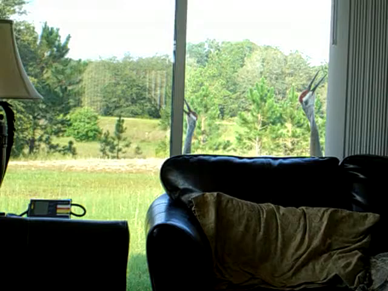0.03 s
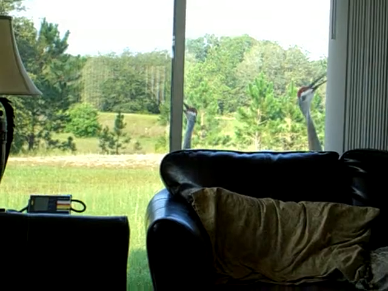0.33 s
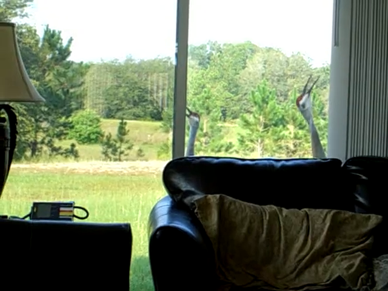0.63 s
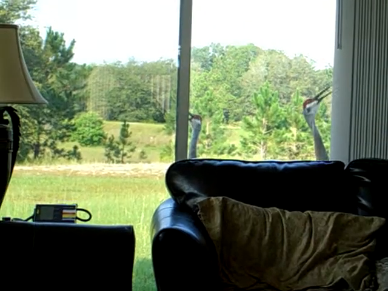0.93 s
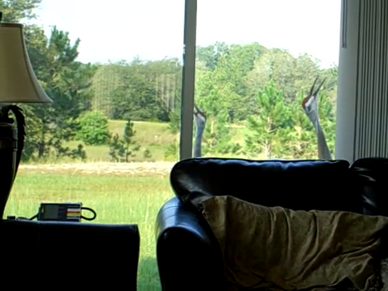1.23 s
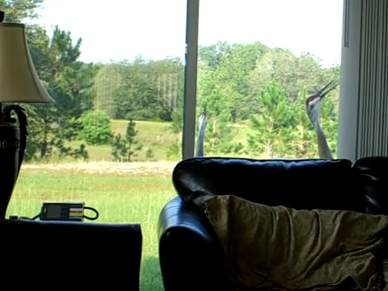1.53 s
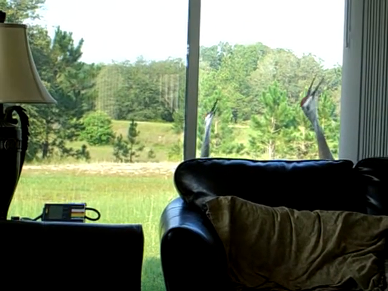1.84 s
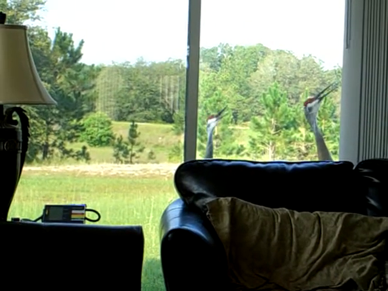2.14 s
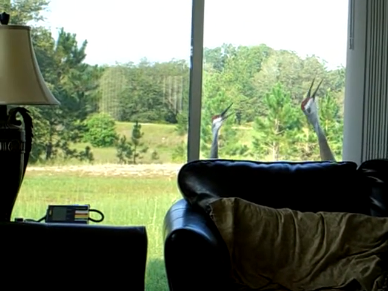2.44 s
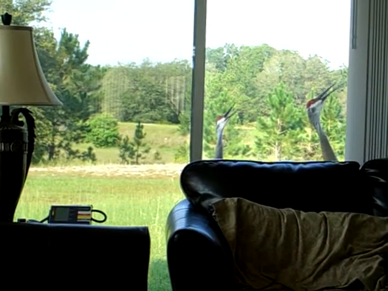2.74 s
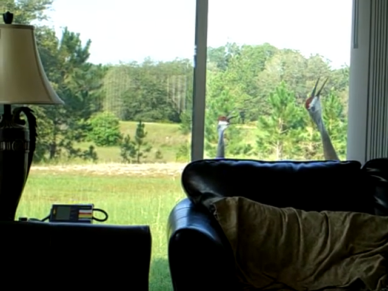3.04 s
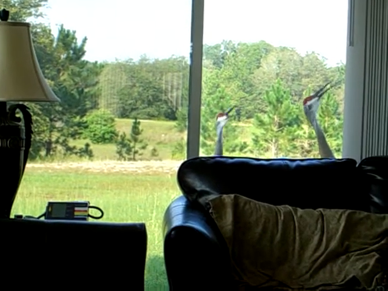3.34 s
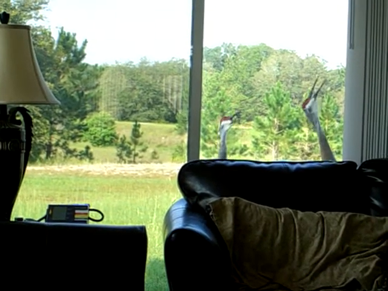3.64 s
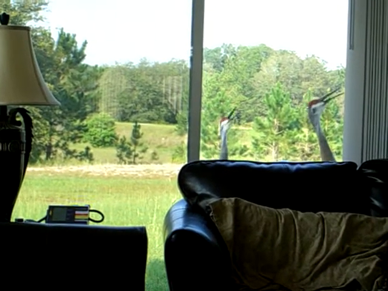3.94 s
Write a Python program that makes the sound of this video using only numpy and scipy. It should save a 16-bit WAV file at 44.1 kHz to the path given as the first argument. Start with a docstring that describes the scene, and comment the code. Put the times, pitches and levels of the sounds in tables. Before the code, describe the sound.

A pair of cranes keeps up a steady, harsh duet: a rattling bugle from one, then one or two higher squawks from the other. The calls come through a window and ring briefly in a living room over faint hiss.

```python
"""Two sandhill cranes call in unison outside a window, with the microphone indoors in a living room.
The male starts each call on a low note, steps up to a clear bugle and breaks into a falling rattle;
the female answers with one or two short, higher, harsh notes. Each voice is a buzzing membrane coloured
by windpipe and bill. The room rings on around the microphone; faint hoots, hum and whine lie below."""
import sys
import numpy as np
from scipy import signal
from scipy.fft import rfft, irfft, next_fast_len
from scipy.io import wavfile
from scipy.ndimage import uniform_filter1d

SR = 44100
rng = np.random.default_rng(int(sys.argv[2]) if len(sys.argv) > 2 else 0)


def wav_out(sig):
    """Save sig, one row per channel (or a flat mono array), as 16-bit PCM at SR to the path in sys.argv[1]."""
    wavfile.write(sys.argv[1], SR, np.round(np.clip(np.atleast_2d(sig).T, -1, 1) * 32767).astype(np.int16))


N = 176400

# The male's calls. Each row: start, step up, break into rattle and end in seconds, bugle pitch in Hz,
# fundamental and overtone trims in dB.
MALE_BUGLES = [(-.04, 0.018, .1, 0.25, 826.8, -3.5, -0.5), (0.617, .672, 0.75, 0.9, 834.5, -2.5, 0),
               (1.195, 1.269, 1.346, 1.5, 832, -3.5, -0.5), (1.795, 1.86, 1.966, 2.088, 831.8, -3, 0.5),
               (2.422, 2.488, 2.585, 2.745, 826, -4, 1), (3.044, 3.104, 3.215, 3.284, 822.6, -2.5, 0),
               (3.608, 3.671, 3.72, 3.885, 820.3, -4, -0.5)]
# Points along his call: 0 is the start, 1 the step, 2 the break, 3 the end.
MALE_POINTS = [0, .2, .8, 1, 1.15, 1.8, 2.15, 2.7, 3]
# One row a point: ratio to the bugle pitch, fundamental and overtones in dB, roughness from 0 to 1.
MALE_CONTOUR = [(.865, -22.5, -24, .35), (.878, -23.5, -30.5, .2), (.895, -23.5, -27.5, 0.21),
                (.975, -29.5, -31, 0.19), (.997, -21.5, -25.5, .05), (.997, -18.5, -27.5, 0.03),
                (1.07, -30, -36, 0.83), (1.02, -24, -33.5, 0.86), (.95, -24.5, -35.5, 0.61)]
# The female's notes. Each row: start and length in seconds, pitch in Hz, fundamental and overtone
# trims in dB.
FEMALE_ANSWERS = [(0.129, 0.067, 980, 2.5, -1), (.245, 0.078, 990, -4.5, -4.5),
                  (0.495, 0.028, 929, -6.5, -14), (0.519, 0.076, 1002, -1.5, -0.5),
                  (0.744, 0.097, 996, -0.5, -4.5), (0.907, 0.071, 1019, 0.5, -0.5),
                  (1.307, 0.16, 1123, -1, -0.5), (1.519, .11, 1136, -1.5, 1), (1.867, 0.082, 1125, 0, -0.5),
                  (2.131, 0.098, 1122, -1, .5), (2.473, .135, 1122, -1, -1), (2.751, .1, 1100, -1.5, -1),
                  (3.166, 0.11, 1091, -1, -2.5), (3.417, 0.11, 1110, -.5, 0), (3.742, 0.093, 1102, 1, -1),
                  (3.963, 0.07, 978, -2.5, -5.5)]
# Points along her note, as shares of its length.
FEMALE_POINTS = [0, .2, .45, .7, 1]
# One row a point: ratio to the note's pitch, fundamental and overtones in dB, roughness from 0 to 1.
FEMALE_CONTOUR = [(.97, -32.5, -28, .2), (1.01, -30.5, -26.5, 0.21), (1.12, -30.5, -28.5, .85),
                  (1.02, -26.5, -27.5, .55), (.98, -27.5, -38, 0.28)]
# Each bird's syrinx: rattle rate in Hz and depth from 0 to 1; rattle pull, rough jitter and clear waver
# as shares of the pitch; overtone swell in seconds; rasp in dB.
MALE_SYRINX = dict(rattle_hz=79.88, depth=.85, pull=0.0933, jitter=.085, waver=0.0073, swell_s=0.015, rasp_db=0)
FEMALE_SYRINX = dict(rattle_hz=110.12, depth=0.64, pull=0.086, jitter=0.0704, waver=0.0089, swell_s=0.0048, rasp_db=-4)
# Colour of windpipe and bill on the overtones. Each row: frequency in Hz, gain in dB.
MALE_WINDPIPE = [(500, -10.5), (1000, 14.5), (1430, 1.5), (1660, 1.5), (1900, 8), (2150, 9.5), (2500, -3.5),
                 (2750, -4), (3300, 3.5), (3700, 2), (4200, 2.5), (5800, 1), (7500, -2.5), (10000, -9),
                 (13000, -19), (15500, -24)]
FEMALE_WINDPIPE = [(500, -7), (1000, 17.5), (1550, 0.5), (2250, 3.5), (2750, -5), (3400, 2), (4500, 1.5),
                   (5800, 1), (7500, -3.5), (10000, -11), (13000, -21), (15500, -23)]
# Faint hoots between the calls. Each row: start in seconds, pitch in Hz, peak in dB ahead of the room.
LOW_HOOTS = [(2.27, 271, -52), (2.89, 279, -48), (3.552, 287, -45.5), (3.869, 293, -48.5)]
# The living room's tail. Each row: frequency in Hz, reverberation time in seconds.
ROOM_DECAY = [(300, 0.87), (1000, 0.53), (3000, .62), (7000, 0.61), (15000, 0.14)]
# Narrow peaks where the sound rings on. Each row: frequency in Hz, width in Hz, gain added at the peak.
RINGING_PEAKS = [(765, 19, 0.53), (1073, 11.5, 0.73), (1120, 4.7, 0.133), (1370, 8.3, 0.37), (1626, 33, 0.66),
                 (2230, 19, 0.55), (4170, 38, 0.32), (4460, 70, 0.67)]
# Room tone at the microphone. Each row: frequency in Hz, relative noise density in dB.
ROOM_TONE = [(25, -5), (70, -5), (130, -2), (270, 2.5), (450, 1), (1000, 7.5), (3000, -7), (8000, -14),
             (15500, -16)]
# Hum and electrical whine. Each row: frequency in Hz, level in dB.
HUM_TONES = [(61, -69), (186, -57.5), (7522, -52.5), (15040, -62)]
# The recorder's level coming up. Each row: time in seconds, gain in dB.
GAIN_RISE = [(.07, -14.5), (.25, -3), (.5, 0.5), (.68, 3)]

ATTACK_S, RELEASE_S = 0.0056, 0.036
JITTER_HZ, RATTLE_SPREAD = 149.8, .3  # speed of the pitch jitter; share by which the rattle rate wanders
SHIMMER_DB, SHIMMER_HZ = 1.2, 51.6  # unsteady loudness of the voice
CHOP_POWER = 1.08  # the rattle chops the overtones harder than the fundamental
BILL_CUT_HZ = 560  # the bill radiates little below this
HOOT_S, HOOT_RISE, HOOT_JITTER = 0.065, 0.22, 0.015  # rise and jitter as shares of the pitch
EARLY_T60_S, EARLY_DB, TAIL_DB, ROOM_EVEN_HZ = .11, 1.5, 0.5, 45
ROOM_TONE_DB, HUM_WAVER_DB, HUM_WANDER_HZ = -47.5, .7, 1.2
SWITCH_ON_S, CUTOFF_HZ = 0.071, 15750


def male_crane():
    """The male, outside the window: low note, clear bugle, falling rattle."""
    calls = [(np.interp(MALE_POINTS, np.arange(len(marks)), marks), hz, db, overtone_db)
             for *marks, hz, db, overtone_db in MALE_BUGLES]
    return crane(calls, MALE_CONTOUR, MALE_SYRINX, MALE_WINDPIPE)


def female_crane():
    """The female, also outside: short arched notes, harshest in the middle."""
    calls = [(start + length * np.array(FEMALE_POINTS), hz, db, overtone_db)
             for start, length, hz, db, overtone_db in FEMALE_ANSWERS]
    return crane(calls, FEMALE_CONTOUR, FEMALE_SYRINX, FEMALE_WINDPIPE)


def crane(calls, contour, voice, windpipe):
    """One bird: every call follows its contour; the windpipe colours the overtones, the bill cuts bass."""
    fundamental, overtones = np.zeros(N), np.zeros(N)
    t = np.arange(SR // 2) / SR
    for times, hz, tone_trim_db, buzz_trim_db in calls:
        start = times[0]
        ratio, tone_db, buzz_db, rough = [np.interp(t, times - start, c) for c in np.transpose(contour)]
        tone, buzz = syrinx(t, times[-1] - start, hz * ratio, rough, **voice)
        add(fundamental, start, tone * from_db(tone_db + tone_trim_db))
        add(overtones, start, buzz * from_db(buzz_db + buzz_trim_db))
    bill = signal.butter(4, BILL_CUT_HZ, "high", fs=SR, output="sos")
    return signal.sosfilt(bill, fundamental) + colour(overtones, windpipe)


def syrinx(t, length, hz, rough, rattle_hz, depth, pull, jitter, waver, swell_s, rasp_db):
    """A membrane buzzes richer as pressure builds; when rough, a rattle chops it and shakes its pitch."""
    size = len(t)
    rattle = 2 * np.pi * np.cumsum(rattle_hz * (1 + RATTLE_SPREAD * drift(rattle_hz, size))) / SR
    pitch = hz * (1 + rough * pull * np.sin(rattle) + (waver + rough * jitter) * drift(JITTER_HZ, size))
    phase = 2 * np.pi * np.cumsum(pitch) / SR
    chop = 1 + depth * rough * np.cos(rattle)
    envelope = np.clip(t / ATTACK_S, 0, 1) * np.exp(-np.maximum(t - length, 0) / (RELEASE_S / 2))
    envelope *= from_db(SHIMMER_DB * drift(SHIMMER_HZ, size))
    richness = 1 - np.exp(-t / swell_s)
    buzz = sum(np.cos(k * phase) * richness ** (k / 5) * (k * pitch < SR / 2) for k in range(2, 22))
    pulsed_noise = rng.standard_normal(size) * (1 + np.cos(phase))
    rasp = pulsed_noise * (.25 + rough) * richness * from_db(rasp_db)  # even a clear note rasps a little
    fundamental = envelope * chop * np.sqrt(2) * np.sin(phase)
    overtones = envelope * chop ** CHOP_POWER * unit_rms(unit_rms(buzz) + rasp)
    return fundamental, overtones


def hoots():
    """Soft, slightly rising low notes, far below the cranes in level."""
    track, progress = np.zeros(N), np.linspace(0, 1, int(HOOT_S * SR))
    for start, hz, db in LOW_HOOTS:
        pitch = hz * (1 + HOOT_RISE * (progress - .5) + HOOT_JITTER * drift(JITTER_HZ, len(progress)))
        phase = 2 * np.pi * np.cumsum(pitch) / SR
        add(track, start, from_db(db) * np.sin(np.pi * progress) * np.sin(phase))
    return track


def living_room(x):
    """At the microphone: direct sound, early reflections, a tail shortest in the treble, ringing peaks."""
    t = np.arange(SR) / SR
    noise, hz = rfft(rng.standard_normal(SR)), np.arange(SR // 2 + 1)
    centres = np.geomspace(250, 16000, 7)
    tail = 0
    for centre, weights in zip(centres, np.eye(len(centres))):
        band = irfft(noise * at_hz(np.c_[centres, weights], hz), SR)
        tail += band * unit_rms(from_db(-60 * t / at_hz(ROOM_DECAY, centre)))
    early = unit_rms(rng.standard_normal(SR) * from_db(-60 * t / EARLY_T60_S))
    response = (from_db(TAIL_DB) * tail + from_db(EARLY_DB) * early) / np.sqrt(SR)
    response[0] += 1  # the direct sound
    indoors = signal.fftconvolve(x, even_out(response))[:N]
    ringing = sum(gain * signal.lfilter(*signal.iirpeak(f, f / width, fs=SR), indoors)
                  for f, width, gain in RINGING_PEAKS)
    return indoors + ringing


def room_tone():
    """Quiet noise around the microphone, with a wavering hum and a thin electrical whine."""
    bed = from_db(ROOM_TONE_DB) * colour(rng.standard_normal(N), ROOM_TONE)
    for hz, db in HUM_TONES:
        phase = 2 * np.pi * np.cumsum(hz + HUM_WANDER_HZ * drift(rate_hz=12.2, size=N)) / SR
        bed += np.sqrt(2) * from_db(db + HUM_WAVER_DB * drift(rate_hz=2, size=N)) * np.sin(phase)
    return bed


def even_out(response):
    """Level the broad humps and holes of a room response, keeping its fine ripple."""
    spectrum = rfft(response)
    power = uniform_filter1d(np.abs(spectrum) ** 2, size=ROOM_EVEN_HZ)
    return irfft(spectrum / np.sqrt(power), len(response))[:len(response) * 3 // 4]


def from_db(db):
    """Decibels to gain."""
    return 10 ** (np.asarray(db) / 20)


def unit_rms(x):
    """Scale to an rms of 1."""
    return x / np.sqrt(np.mean(x ** 2) + 1e-20)


def at_hz(points, hz):
    """Read a table along log frequency."""
    freqs, values = np.transpose(points)
    return np.interp(np.log(np.maximum(hz, 1)), np.log(freqs), values)


def colour(x, spectrum):
    """Filter by a smooth spectrum, keeping the power of white noise."""
    size = next_fast_len(len(x) + 4096)
    gain = from_db(at_hz(spectrum, np.arange(size // 2 + 1) * SR / size))
    return irfft(rfft(x, size) * unit_rms(gain), size)[:len(x)]


def drift(rate_hz, size):
    """Smooth random wander of spread 1."""
    pole = np.exp(-2 * np.pi * rate_hz * 10 / SR)  # runs at a tenth of the sample rate
    slow = signal.lfilter([1], [1, -2 * pole, pole * pole], rng.standard_normal(size // 10 + 4002))[4000:]
    return np.interp(np.arange(size) / 10, np.arange(len(slow)), unit_rms(slow))


def add(track, start_s, x):
    """Mix a sound into a track at a given time."""
    i = int(start_s * SR)
    x = x[max(-i, 0):max(N - i, 0)]
    track[max(i, 0):max(i, 0) + len(x)] += x


def scene():
    """Both cranes and the hoots reach one indoor microphone through the room, over the room tone."""
    return (living_room(male_crane() + female_crane() + hoots()) + room_tone())[None]


def record(dry):
    """The recorder switches on, fades in and cuts the top."""
    t = np.arange(N) / SR
    gain = (t > SWITCH_ON_S) * from_db(np.interp(t, *np.transpose(GAIN_RISE)))
    top_cut = signal.ellip(12, .2, 90, CUTOFF_HZ, fs=SR, output="sos")
    return signal.sosfilt(top_cut, dry * gain)


dry = scene()
out = record(dry)
wav_out(out)
```